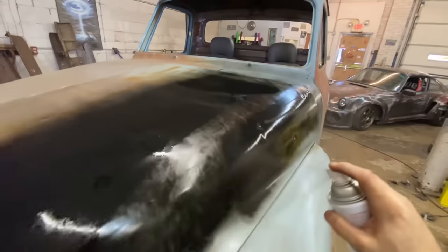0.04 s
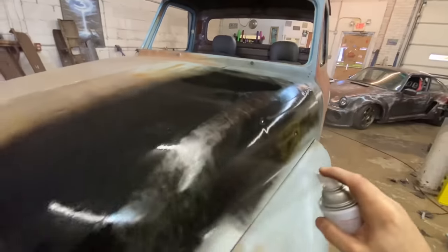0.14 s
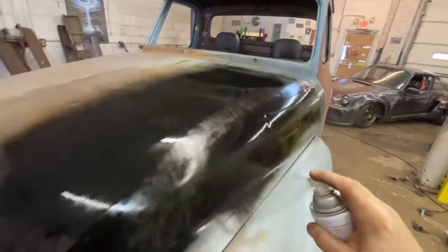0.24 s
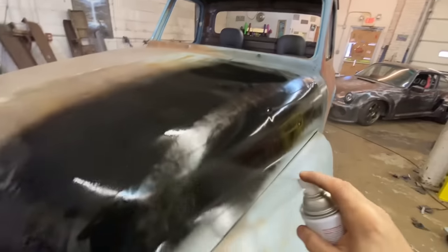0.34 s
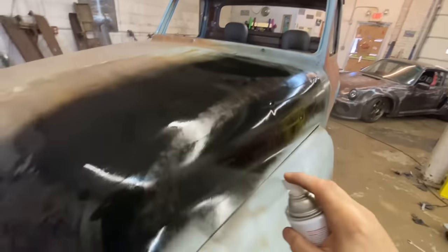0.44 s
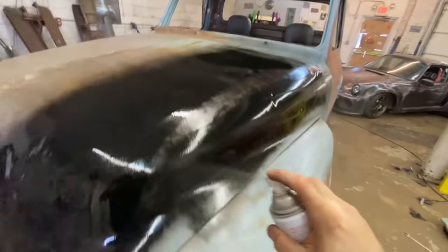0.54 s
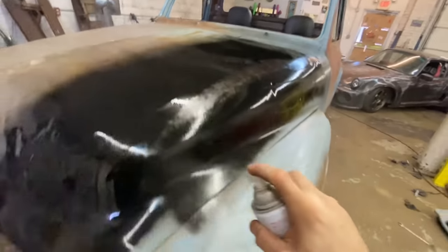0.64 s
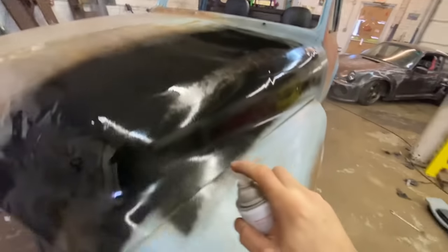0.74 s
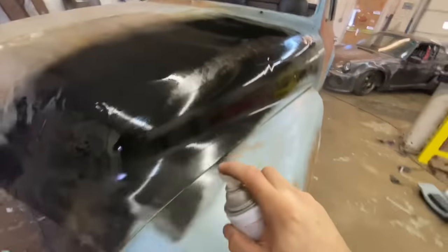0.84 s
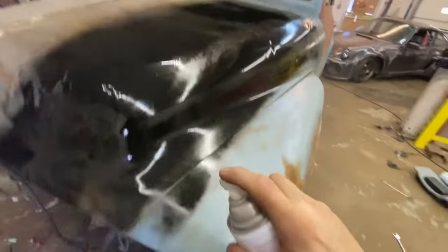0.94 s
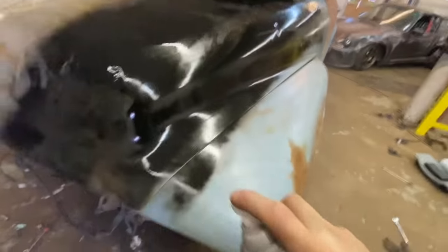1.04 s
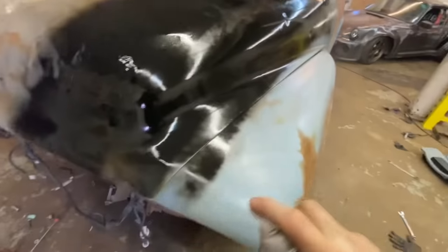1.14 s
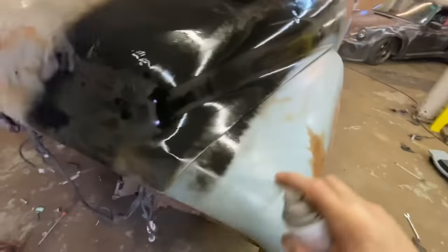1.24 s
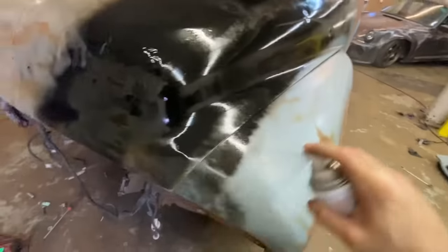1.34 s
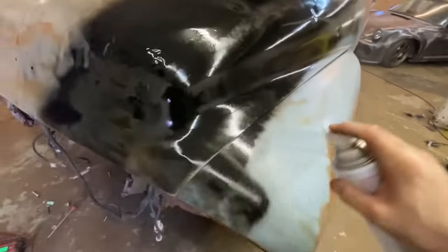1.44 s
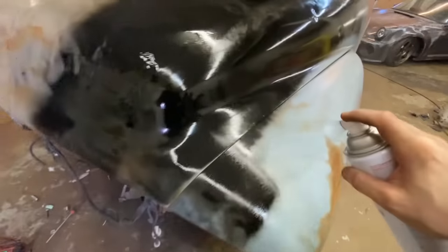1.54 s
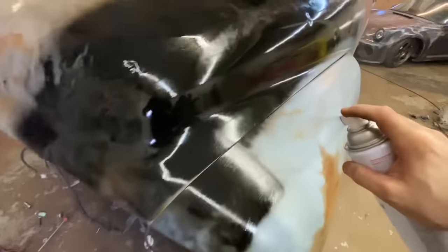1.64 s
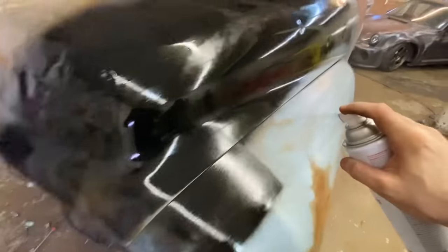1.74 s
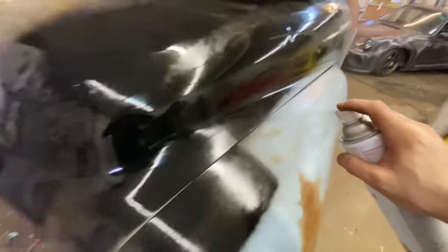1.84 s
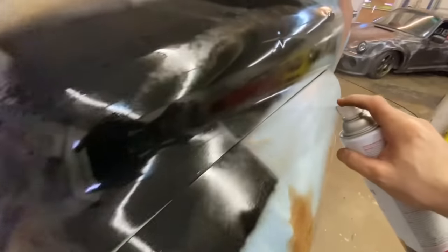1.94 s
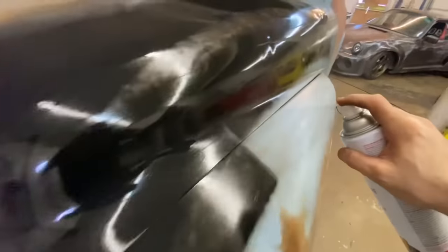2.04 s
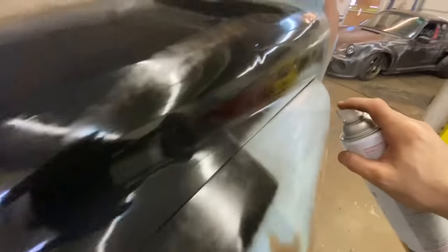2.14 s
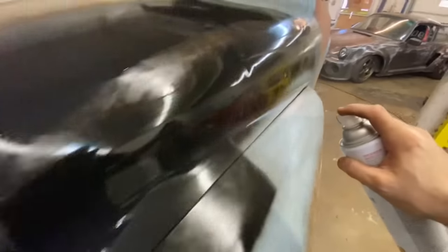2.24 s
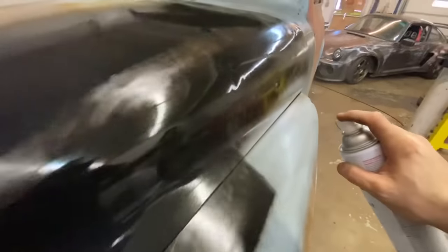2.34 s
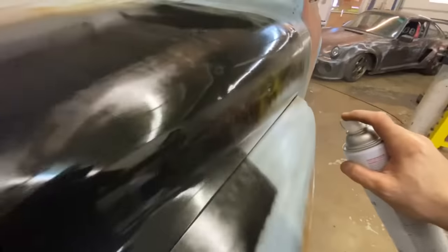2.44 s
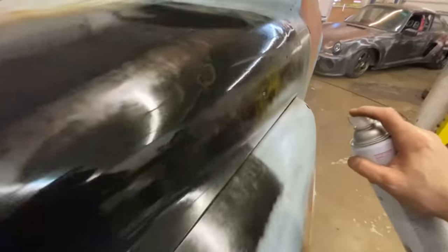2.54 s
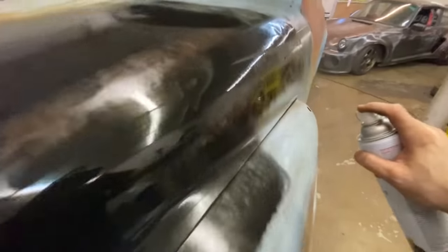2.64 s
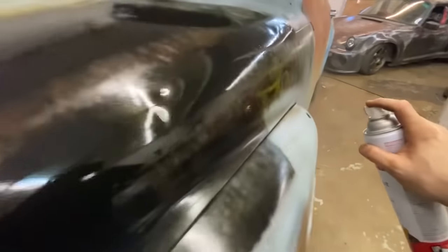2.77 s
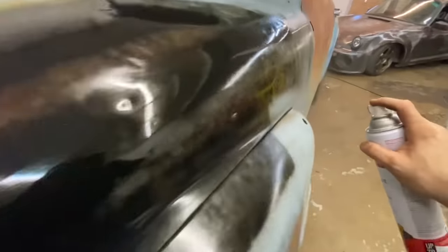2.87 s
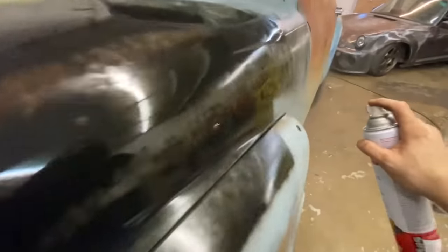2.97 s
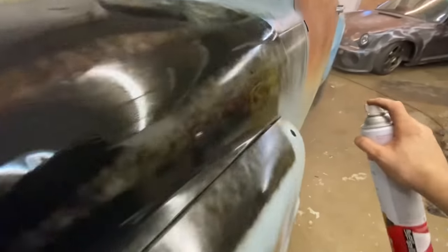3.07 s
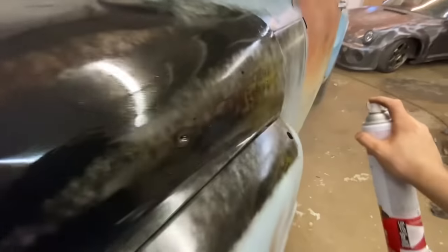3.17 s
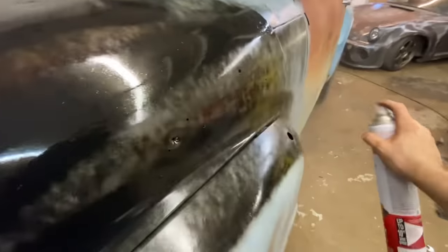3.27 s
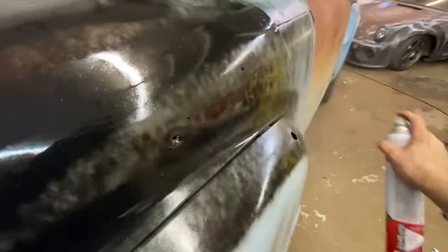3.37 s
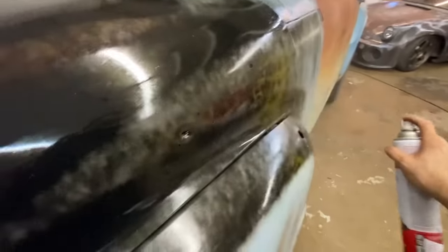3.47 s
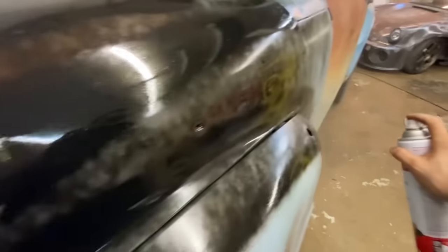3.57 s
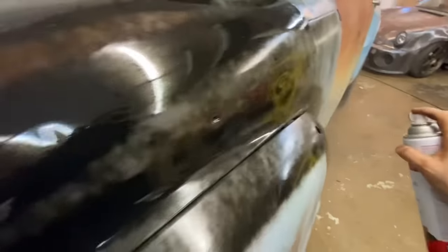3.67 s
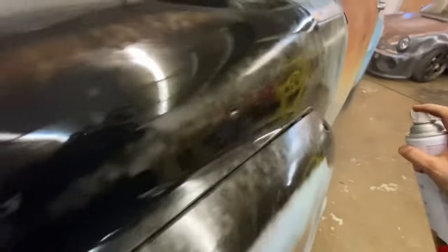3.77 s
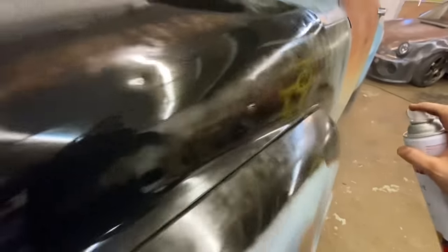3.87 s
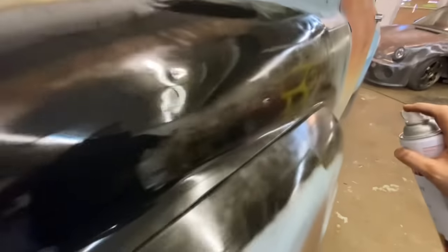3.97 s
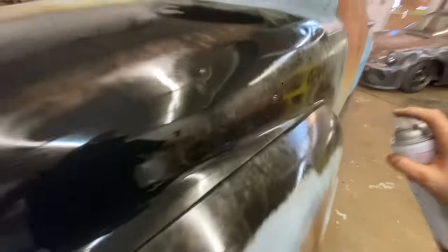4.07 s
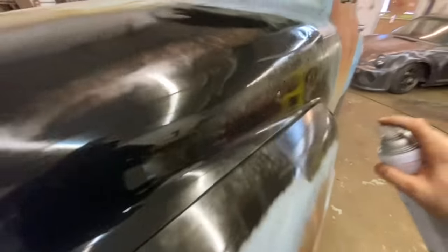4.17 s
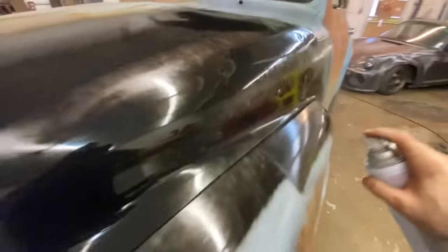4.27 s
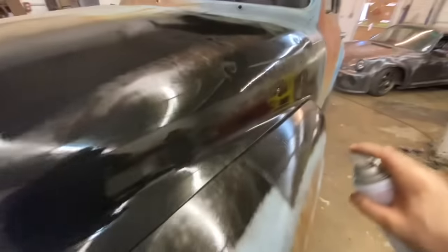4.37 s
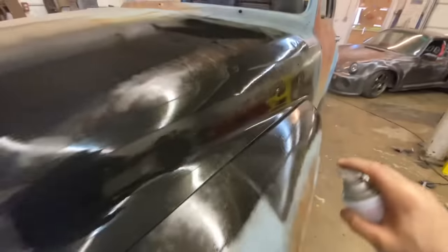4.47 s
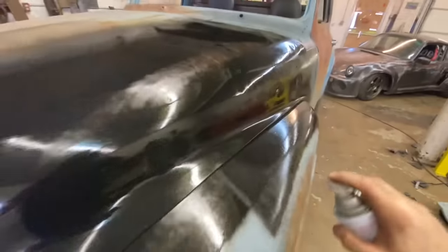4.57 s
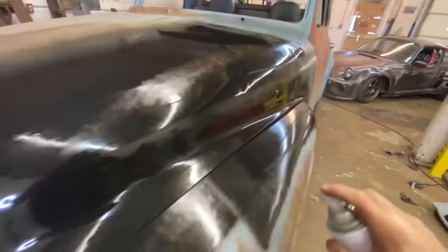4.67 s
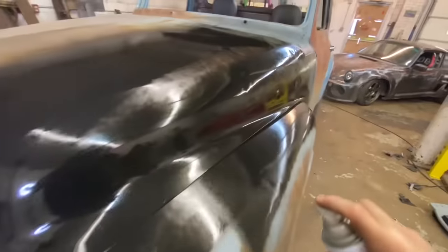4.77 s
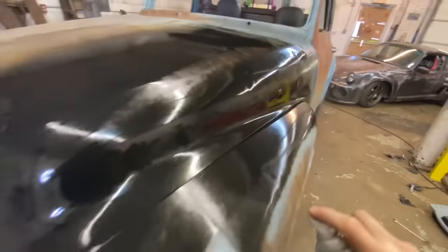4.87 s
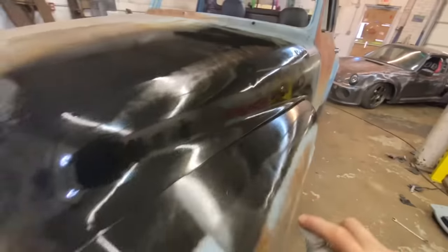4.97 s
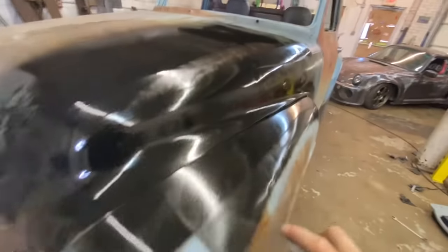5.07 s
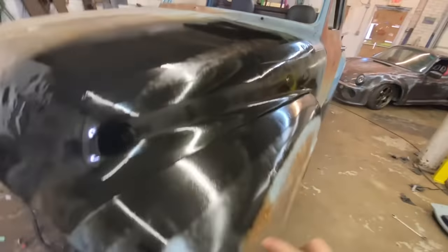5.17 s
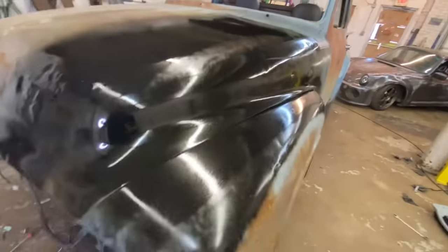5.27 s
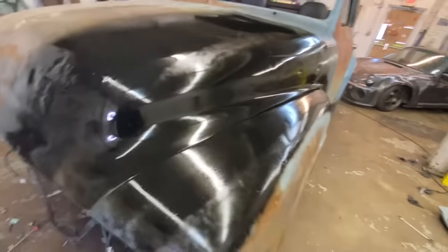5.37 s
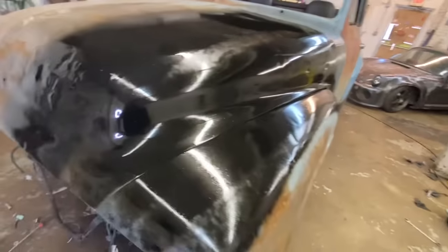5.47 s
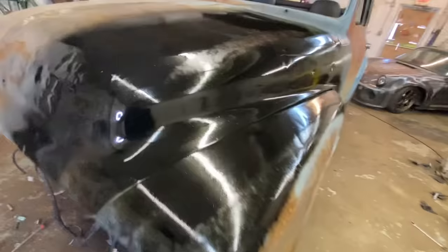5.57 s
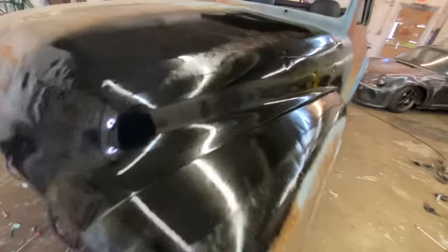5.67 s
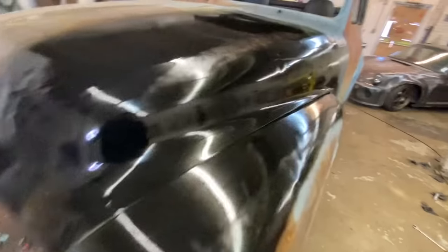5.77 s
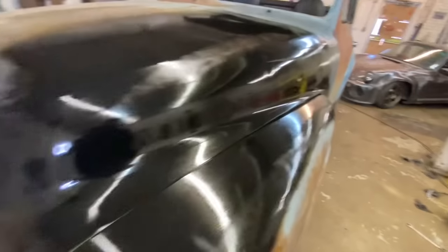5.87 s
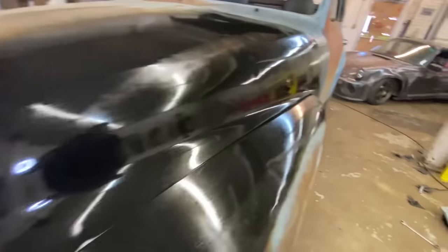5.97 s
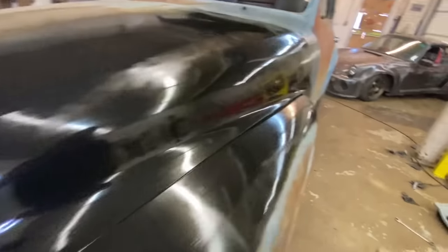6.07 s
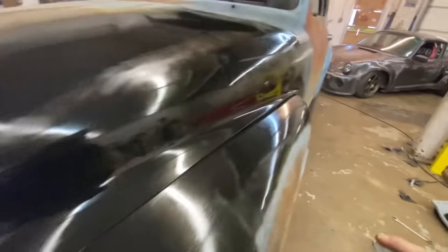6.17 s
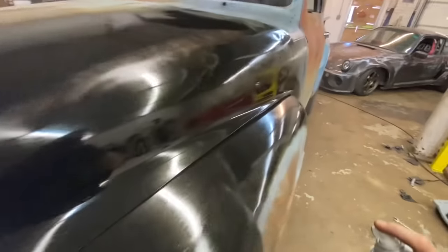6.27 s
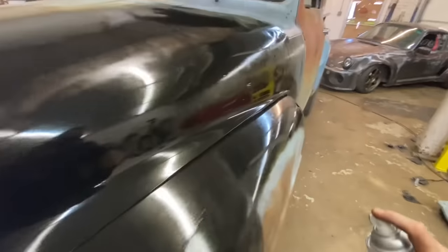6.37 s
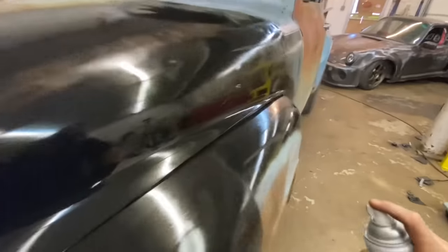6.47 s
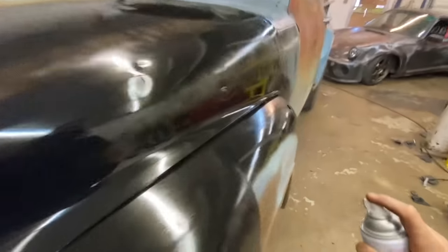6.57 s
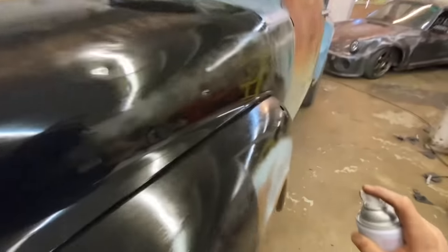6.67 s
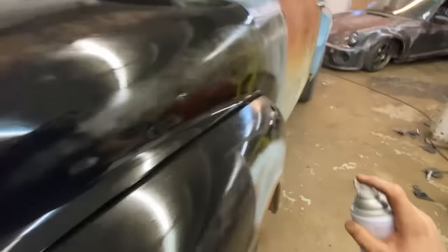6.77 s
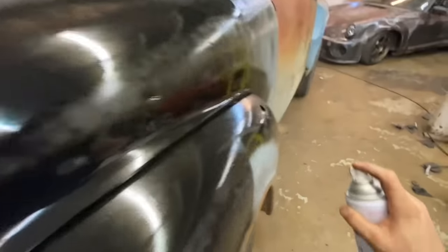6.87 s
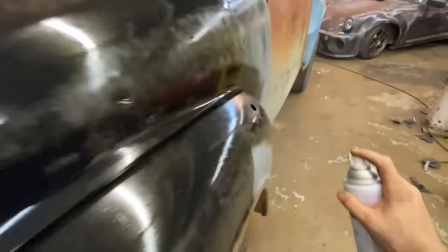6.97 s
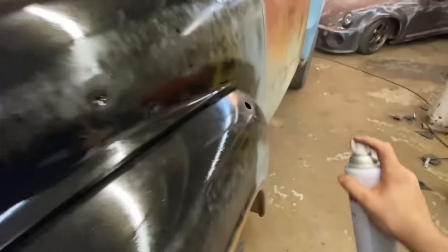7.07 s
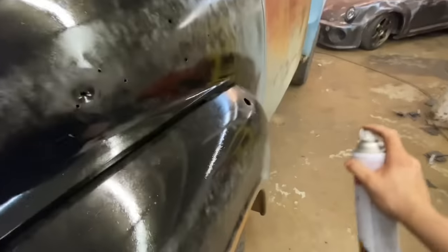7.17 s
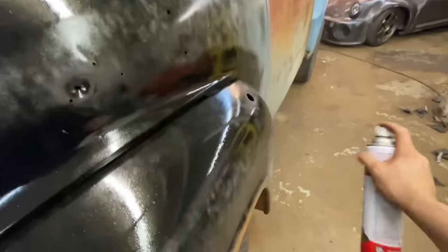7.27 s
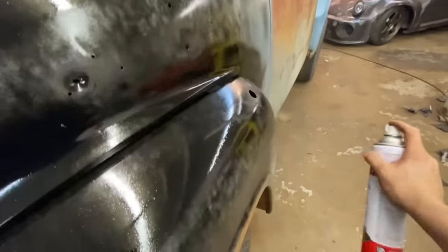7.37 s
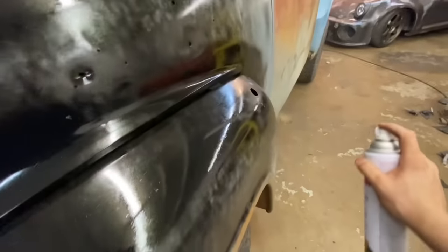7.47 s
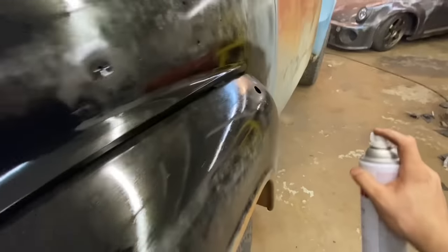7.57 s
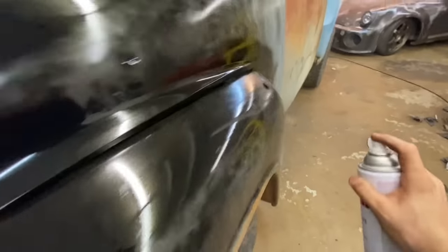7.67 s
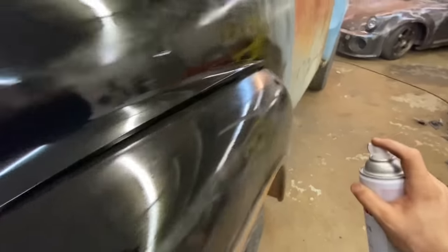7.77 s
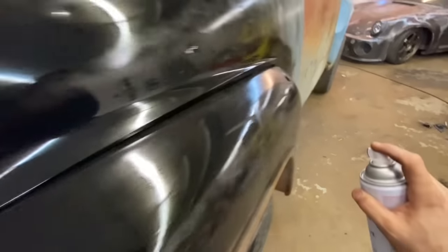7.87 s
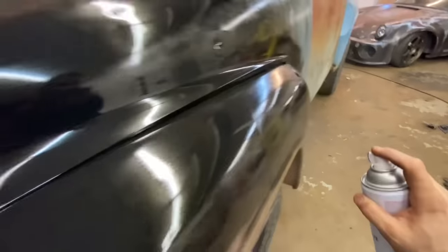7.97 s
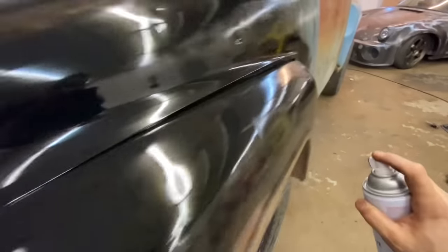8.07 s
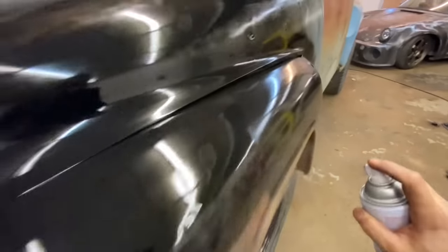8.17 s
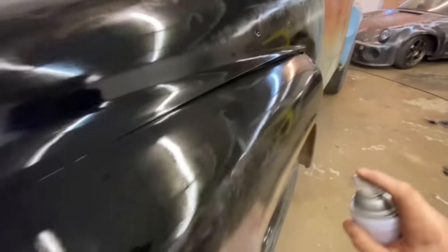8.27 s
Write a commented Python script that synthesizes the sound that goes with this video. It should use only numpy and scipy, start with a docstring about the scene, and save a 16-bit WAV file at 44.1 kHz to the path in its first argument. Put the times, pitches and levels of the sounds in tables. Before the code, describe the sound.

A spray can hisses close to a stereo microphone in a garage, already spraying at the start. It cuts off briefly, then restarts with a crisp spit, four times in all. Reflections from the curved car panel make the bright airy hiss sweep and turn hollow. Short room tails and low ventilation rumble show in the gaps, with a few dull scuffs.

```python
"""Five passes of hiss, the first already running, the later four starting with a spit; echoes comb the hiss.
A hand-held paint can sprays along a car wing in a garage, close to a two-port camera microphone.
Jet: shaped noise under a spitting valve; panel: moving delays; garage: decaying noise, heard in the breaks.
Behind it: dull scuffs of band noise, puffs of deep opposed noise, ventilation rumble with hums."""
import sys
import numpy as np
from scipy import signal
from scipy.fft import rfft, irfft
from scipy.io import wavfile
from scipy.ndimage import map_coordinates

SR = 44100
rng = np.random.default_rng(int(sys.argv[2]) if len(sys.argv) > 2 else 0)


def digitize_waveform(pressure):
    """Quantize a signal to 16-bit integers and store it at the path in sys.argv[1].

    Rows of a 2-D input are taken as channels; values are limited to [-1, 1].
    """
    field = np.atleast_2d(pressure).T
    bounded = np.clip(field, -1, 1)
    quanta = np.round(bounded * 32767).astype(np.int16)
    wavfile.write(sys.argv[1], SR, quanta)


N = 366912
TIME, HZ = np.arange(N) / SR, np.arange(N // 2 + 1) * SR / N

# extra path of the echoes:
# (time [s], near panel to left port [ms], near panel to right port [ms], far panel to left port [ms])
ECHO_PATHS = [(0.0, 1.284, 1.335, 1.315), (0.4, 1.407, 1.561, 1.558), (0.88, 1.592, 1.786, 1.759),
              (1.18, 1.265, 1.69, 1.742), (1.5, 1.04, 1.543, 1.53), (2.0, 0.935, 1.361, 1.338),
              (2.4, 0.883, 1.132, 1.139), (2.8, 0.671, 0.934, 0.795), (3.27, 0.478, 0.698, 0.695),
              (3.49, 0.467, 0.689, 0.685), (4.4, 0.87, 1.03, 1.34), (5.0, 1.226, 1.34, 1.907),
              (5.3, 1.183, 1.272, 2.101), (5.5, 0.98, 1.15, 1.77), (6.0, 0.873, 1.093, 1.627),
              (6.8, 0.73, 0.94, 1.1), (7.25, 0.518, 0.72, 0.87), (7.44, 0.523, 0.78, 0.858),
              (8.32, 0.788, 0.998, 1.25)]


def from_db(db):
    """dB to gain."""
    return 10 ** (np.asarray(db) / 20)


def rms_one(x):
    """Scale to rms 1."""
    return x / np.sqrt(np.mean(x ** 2) + 1e-20)


def in_time(rows):
    """Columns of a table, interpolated at every sample."""
    s, *columns = np.transpose(rows)
    return [np.interp(TIME, s, c) for c in columns]


def coloured(spectrum, channels=1):
    """Noise with a (frequency [Hz], level [dB]) spectrum, rms 1."""
    hz, db = np.transpose(spectrum)
    gain = from_db(np.interp(np.log(HZ + 1), np.log(hz), db))
    white = rng.standard_normal((channels, N))
    return rms_one(irfft(rfft(white) * gain, N))


def drift(rate_hz):
    """Slow random wander, rms 1: white noise low-passed at rate_hz."""
    return rms_one(irfft(rfft(rng.standard_normal(N)) / (1 + (HZ / rate_hz) ** 2), N))


def band(x, low_hz, high_hz):
    """Band-pass."""
    return signal.sosfilt(signal.butter(2, [low_hz, high_hz], "band", fs=SR, output="sos"), x)


def late(x, ms):
    """Delay x by a changing time; wraps round."""
    return map_coordinates(x, [np.arange(N) - ms * SR / 1000], order=4, mode="grid-wrap")


def jet():
    """Turbulent hiss under the valve: a faint hiss ahead of each opening, a spit, steady flow, a quick shut."""
    # one row a pass: (faint hiss start [s], faint hiss level [dB], opening [s], spit over the jet [dB],
    # spit length [s], shutting [s])
    valve_passes = [(-.1, -60, -.05, 0, .016, .888), (1.149, -46.5, 1.178, 10.5, .02, 3.272),
                    (3.457, -46.5, 3.486, 11, .012, 5.31), (5.31, -37, 5.495, 11.5, .0105, 7.237),
                    (7.41, -46.5, 7.438, 8, .02, 8.5)]
    # hiss level, one curve a pass: (time [s], level [dB])
    flow_levels = [
        [(0, -26.5), (.3, -25.5), (.44, -24.5), (.58, -27), (.68, -24.5), (.87, -28.5)],
        [(1.23, -28), (1.36, -25.5), (1.45, -27), (2.1, -27), (2.24, -26), (2.65, -27), (2.85, -27.5),
         (3.1, -28.5), (3.22, -28.5)],
        [(3.52, -31.5), (3.7, -29), (3.8, -25.5), (3.95, -29), (4.4, -27), (4.53, -27), (4.63, -29),
         (4.8, -26.5), (5.18, -29), (5.27, -27)],
        [(5.53, -27.5), (5.65, -27.5), (5.83, -24), (5.92, -27), (6.13, -26), (6.22, -30), (6.38, -24.5),
         (6.53, -26.5), (6.73, -24.5), (6.87, -27), (7.03, -25.5), (7.16, -28.5)],
        [(7.5, -28), (7.6, -28.5), (7.73, -26), (7.86, -29), (7.98, -26.5), (8.15, -27.5), (8.3, -24)],
    ]
    # nozzle hiss: (frequency [Hz], relative density [dB per Hz])
    nozzle = [(120, -16.5), (300, -10), (800, -3), (1300, -4.5), (1800, -2.5), (2400, 1), (3400, -3),
              (4500, 0.5), (7500, 4.5), (9200, 3.5), (11000, 4), (12500, 4.4), (14000, 1.5), (16000, 1)]
    # 300-750 Hz against the rest: (time [s], level [dB])
    body = [(0, -4), (.9, 2.5), (1.3, -3), (2.5, -3), (3.3, 6.5), (4.2, -7.5), (4.7, 3), (5.6, 1.5),
            (6.6, 2.5), (7.3, -4.5), (8.32, -7.5)]
    # below 2.5 kHz the hiss thins where the near path is short, and just after each opening
    dull_db, thin_below_ms, thin_db_per_ms = 2, 0.7, 14
    spit_thin_db, spit_thin_s = 2.5, 0.022
    # the faint hiss gathers in one band over a weaker broad hiss
    faint_low_hz, faint_high_hz, faint_band_db, faint_broad_db = 4570, 8300, -3.5, -3

    noise = coloured(nozzle)[0]
    noise = noise + (from_db(in_time(body)[0]) - 1) * band(noise, 300, 750)
    dull = signal.sosfilt(signal.butter(2, 2500, fs=SR, output="sos"), noise)
    near_left_ms = in_time(ECHO_PATHS)[0]
    low_db = dull_db - thin_db_per_ms * np.maximum(thin_below_ms - near_left_ms, 0)

    flow, faint = np.zeros((2, N))
    for (faint_start, faint_db, opens, spit_db, spit_s, shuts), level in zip(valve_passes, flow_levels):
        since = TIME - opens
        faint += from_db(faint_db) * (TIME > faint_start) * (since < 0)
        spit = from_db(spit_db * np.exp(-(np.maximum(since, 0) / spit_s) ** 2.5))
        opening = np.clip(since / .012 + .6, 0, 1) ** 3
        closing = np.clip((shuts + .008 - TIME) / .025, 0, 1)
        flow += opening * closing * spit * from_db(in_time(level)[0])
        low_db -= spit_thin_db * (since > 0) * np.exp(-np.abs(since) / spit_thin_s)

    # droplets make the flow flutter
    flutter = from_db(1.25 * drift(5.4) + 0.74 * drift(270))
    flow_noise = noise + dull * (from_db(low_db) - 1)
    faint_noise = from_db(faint_band_db) * band(noise, faint_low_hz, faint_high_hz)
    faint_noise += from_db(faint_broad_db) * noise
    return flutter * (flow * flow_noise + faint * faint_noise)


def echoes(x, near_ms, far_ms):
    """One port's echoes: both panels, waxing and waning with the curve of the metal, and scatter from arm and body."""
    # weaker scatter: (share of the near path [ratio], extra delay [ms], mean level [dB])
    scatter = [(.5, .05, -13), (1.0, -.2, -13), (0, .3, -14)]
    near_db, far_db, near_low_db = -9, -11, -11.5
    out = from_db(near_db + 3 * drift(3)) * late(x, near_ms + .025 * drift(6))
    out += from_db(far_db + 3.5 * drift(3)) * late(x, far_ms + .03 * drift(6))
    # the broad near panel returns more of the low hiss
    out += from_db(near_low_db) * late(band(x, 250, 1600), near_ms)
    for share, extra_ms, db in scatter:
        delay_ms = share * near_ms + extra_ms + .03 * drift(.6)
        out += from_db(db + 1.5 * drift(1.5)) * late(x, delay_ms)
    return out


def panel(x, shade_db):
    """Direct sound plus echoes at each port; as the can swings left, the left port hears the lows sooner."""
    # swing of the can: (time [s], lead of the left port [ms])
    left_lead = [(0, .04), (.4, .05), (.6, .18), (1.25, .18), (1.45, .03), (1.9, 0), (4.5, 0), (4.7, .1),
                 (5, .125), (5.2, .23), (5.6, .19), (5.8, .045), (6.3, 0)]
    lead_below_hz, far_right_extra_ms = 7500, .2
    shade_low_hz, shade_high_hz = 4010, 6340
    near_left, near_right, far = in_time(ECHO_PATHS)
    left = x + echoes(x, near_left, far)
    right = x + echoes(x, near_right, far + far_right_extra_ms)

    low = irfft(rfft(left) / (1 + (HZ / lead_below_hz) ** 12), N)
    left = left - low + late(low, -in_time(left_lead)[0])

    # the camera body shades one band, oppositely at the two ports
    shade = from_db(shade_db / 2)
    left = left + (shade - 1) * band(left, shade_low_hz, shade_high_hz)
    right = right + (1 / shade - 1) * band(right, shade_low_hz, shade_high_hz)
    return left, right


def garage(x):
    """Diffuse tail: noise that dies band by band, its own at each port; it wraps round, the spray is already on."""
    # decay: (frequency [Hz], T60 [s])
    decay = [(300, .5), (1000, .65), (2500, .5), (6000, .6), (14000, .05)]
    low_db, low_below_hz = -1.5, 1100
    decay_hz, decay_s = np.transpose(decay)
    tail, t = np.zeros((2, N)), TIME[:SR]
    edges_hz = 150 * 2. ** np.arange(0, 7.1, .5)
    for low, high in zip(edges_hz, edges_hz[1:]):
        t60 = np.interp(np.log(low * high) / 2, np.log(decay_hz), decay_s)
        fade = from_db(-60 * t / t60) * (t > .006)
        thinning = from_db(low_db * (high < low_below_hz))
        tail[:, :SR] += band(rng.standard_normal((2, SR)), low, high) * fade * thinning
    tail /= np.sqrt(np.sum(tail ** 2) / 2)
    return irfft(rfft(tail) * rfft(x), N)


def ports(left, right):
    """The ports differ in phase and level; towards the top both carry one signal, in or out of phase."""
    # left port against the right: (frequency [Hz], phase [half turns])
    port_phase = [(0, 0), (520, -.33), (1200, -.5), (1550, -1), (2200, -2), (2600, -2.75), (3600, -3.1),
                  (4100, -3.6), (4650, -3.75), (6300, -3.95), (7200, -4), (7900, -4.7), (8600, -4.45),
                  (9050, -4.95), (9600, -5.05), (10300, -6), (11800, -6), (12700, -7), (13850, -7),
                  (14500, -8)]
    # left port against the right, where not shared: (frequency [Hz], level [dB])
    port_level = [(20, -11), (800, -1), (1300, 2.3), (1800, -1.5), (2500, -1.5), (3400, 6.5), (6500, -1.96),
                  (9300, 1.5)]
    shared_hz = 10300  # centre of the crossover
    turn = np.exp(1j * np.pi * np.interp(HZ, *np.transpose(port_phase)))
    own = rfft(left) * from_db(np.interp(HZ, *np.transpose(port_level)))
    shared = np.clip(.5 + (HZ - shared_hz) / 2500, 0, 1)
    mixed = own * (1 - shared) + rfft(right) * shared
    return np.array([irfft(turn * mixed, N), right])


def hollow(pair):
    """Gliding bands in which the sum of the two channels drops out, leaving a hollow hiss."""
    # (start [s], end [s], start frequency [Hz], end frequency [Hz], nominal width [Hz])
    gliding_bands = [(0.213, 0.34, 5170, 5060, 550), (.78, 0.906, 3250, 3220, 353),
                     (1.414, 1.78, 3180, 3630, 200), (1.76, 2.56, 3590, 3710, 384),
                     (2.52, 2.907, 2730, 3330, 680), (3.156, 3.283, 2720, 2630, 408),
                     (3.504, 3.8, 3150, 2650, 170), (3.972, 4.09, 2700, 2720, 180),
                     (4.075, 4.317, 2890, 3130, 810), (4.3, 4.47, 3000, 2900, 280),
                     (5.6, 5.94, 2740, 2330, 250), (5.97, 6.16, 2500, 2780, 334),
                     (5.85, 6.1, 3350, 3620, 380), (6.3, 7.073, 3180, 3240, 280),
                     (6.262, 6.62, 2650, 2530, 250), (6.623, 6.688, 2950, 2970, 796),
                     (6.88, 7.007, 3200, 3280, 680), (7.436, 7.53, 2770, 2840, 455),
                     (7.713, 7.96, 3430, 3250, 720), (7.937, 8.127, 3150, 3350, 715),
                     (8.09, 8.4, 3120, 2700, 600), (.08, 0.333, 9350, 9770, 500),
                     (.76, 0.903, 8560, 8600, 905), (1.194, 1.4, 9400, 9300, 500),
                     (3.947, 4.445, 9350, 9300, 500), (4.8, 5.22, 9400, 9400, 300),
                     (6.75, 7.2, 9300, 9350, 400), (7.438, 7.852, 9130, 9250, 560),
                     (7.456, 7.88, 7850, 8300, 350)]
    depth_db, wander, fade_s = -52, .22, 0.035
    half_sum = pair.mean(axis=0)
    hz, s, frames = signal.stft(half_sum, SR, nperseg=1024, noverlap=768)
    db = np.zeros(frames.shape)
    # centre and width wander
    shift, swell = (wander * np.interp(s, TIME, drift(20.0)) for _ in range(2))
    for start, end, from_hz, to_hz, width_hz in gliding_bands:
        centre_hz = np.interp(s, [start, end], [from_hz, to_hz])
        off = (hz[:, None] - centre_hz) / width_hz - shift / 3
        on = np.clip(np.minimum(s - start, end - s) / fade_s + .5, 0, 1)
        db += depth_db * on * np.exp(-(2 * off * np.exp(swell)) ** 6)
    kept = signal.istft(frames * from_db(db), SR, nperseg=1024, noverlap=768)[1][:N]
    return pair - half_sum + kept


def scuffs():
    """Short rubs and thuds nearby: noise in one broad resonance each."""
    # (start [s], length [s], centre [Hz], width [Hz], level at the peak of the swell [dB], left over right [dB])
    rubs = [(0.68, 0.093, 850, 1060, -34.5, 8.5), (1.617, 0.87, 462, 140, -45, -12.5),
            (3.103, 0.14, 174, 129, -39, -5), (5.283, 0.5, 860, 500, -47, -16.5),
            (2.96, 0.37, 476, 250, -51.5, -14), (5.167, 0.95, 390, 213, -51, -16.5)]
    out, white = np.zeros((2, N)), rng.standard_normal(N)
    for s, length, hz, width_hz, db, pan_db in rubs:
        swell = np.sin(np.pi * np.clip((TIME - s) / length, 0, 1)) ** .7
        rub = rms_one(band(white, hz - width_hz / 2, hz + width_hz / 2))
        gain = from_db(db + np.array([[pan_db / 2], [-pan_db / 2]]))
        out += gain * swell * rub
    return out


def puffs():
    """Puffs of air on the ports: lumps of deep noise that push one port as they pull the other."""
    # (start [s], length [s], level at the peak of the swell [dB])
    gusts = [(2.18, 0.17, -42), (3.87, .2, -49), (4.52, .07, -50), (6.59, .07, -43), (7.897, 0.24, -38)]
    swell = np.zeros(N)
    for s, length, db in gusts:
        swell += from_db(db) * np.sin(np.pi * np.clip((TIME - s) / length, 0, 1))
    return swell * rms_one(band(rng.standard_normal(N), 35, 105)) * [[1], [-1]]


def ventilation():
    """Low rumble, partly common to both ports, with wavering hums."""
    # (frequency [Hz], relative density [dB per Hz])
    rumble = [(20, -25), (45, -22), (70, 2), (95, -8), (120, -8), (160, -8), (220, -16.5), (300, -15.5),
              (420, -20.5), (650, -23), (1000, -30), (4000, -35), (11500, -49), (12800, -80)]
    # (frequency [Hz], median rms level before panning [dB])
    hums = [(120, -59), (220, -64), (241, -67)]
    rumble_db = -47
    mid, side = coloured(rumble, channels=2)
    hum = np.zeros(N)
    for hz, db in hums:
        waver = from_db(db + 4.5 * drift(2.0))
        hum += waver * np.sqrt(2) * np.sin(2 * np.pi * hz * TIME)
    return from_db(rumble_db) * (mid + 0.39 * side * [[1], [-1]]) + hum * from_db([[-1.5], [1.5]])


def scene():
    """Spray with its echoes and tail, over scuffs, puffs and rumble."""
    # shading by the camera body: (time [s], left over right [dB])
    body_shade = [(0, 13), (.26, 5.5), (.43, 15), (.55, 4), (.88, 1), (1.2, 4.5), (1.7, -2), (2, 8),
                  (2.4, 0), (2.7, -3), (3.2, -4), (3.9, -12), (4.4, 7), (5.1, 14), (5.5, 16), (6.2, 9),
                  (6.8, -3.5), (8.32, 0)]
    garage_db, arm_ms = -7.5, 1.5
    spray = jet()
    left, right = panel(spray, in_time(body_shade)[0])
    # the path into the room wanders as the arm moves
    tail = from_db(garage_db) * garage(late(spray, arm_ms * drift(0.99)))
    heard = ports(left + tail[0], right + tail[1])
    return hollow(heard + scuffs() + ventilation()) + puffs()


def record(dry):
    """Steep elliptic low-pass: the top is cut."""
    cutoff_hz = 15750
    return signal.sosfilt(signal.ellip(14, .3, 60, cutoff_hz, fs=SR, output="sos"), dry)


dry = scene()
out = record(dry)
digitize_waveform(out)
```